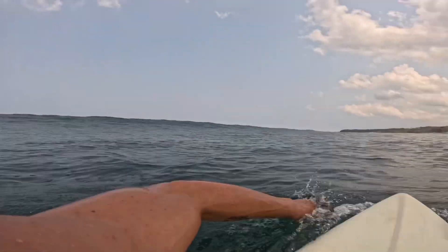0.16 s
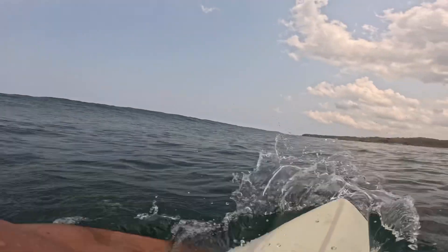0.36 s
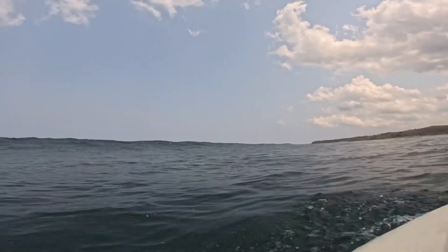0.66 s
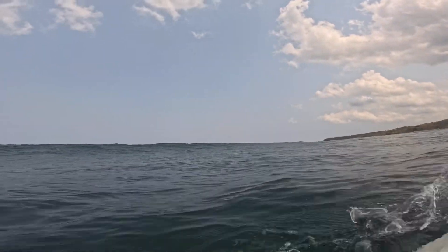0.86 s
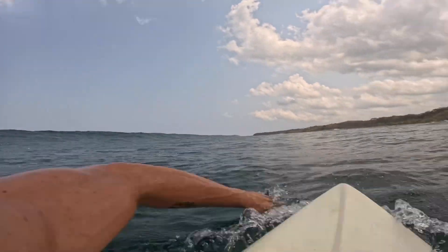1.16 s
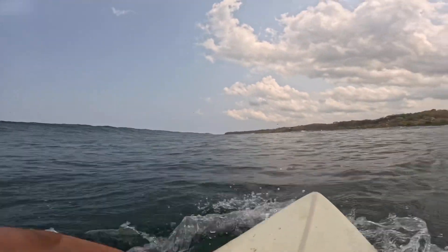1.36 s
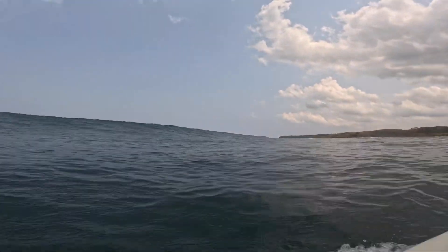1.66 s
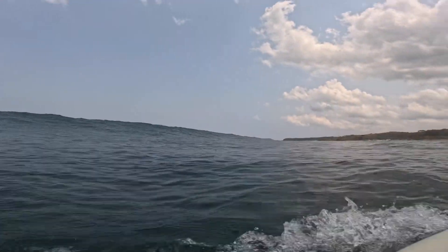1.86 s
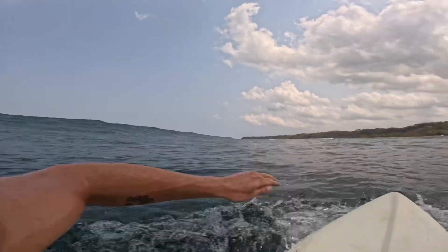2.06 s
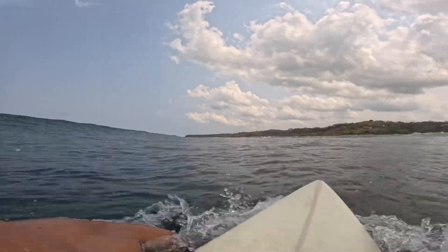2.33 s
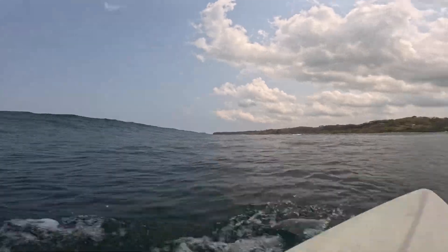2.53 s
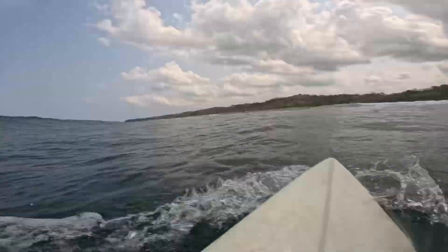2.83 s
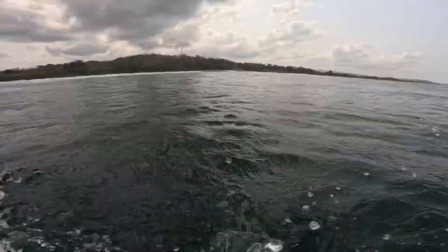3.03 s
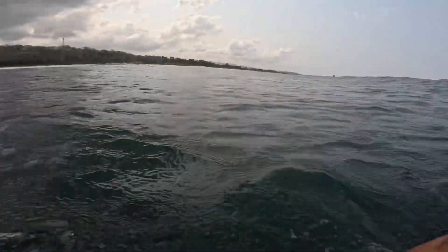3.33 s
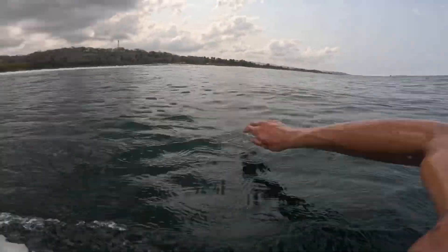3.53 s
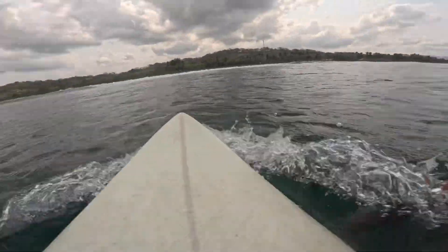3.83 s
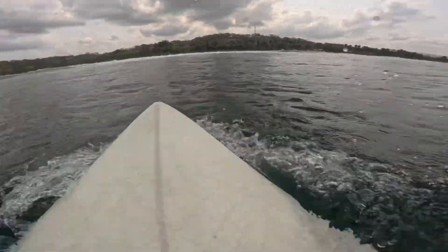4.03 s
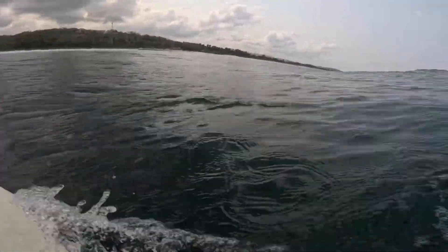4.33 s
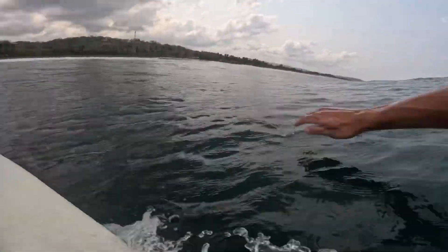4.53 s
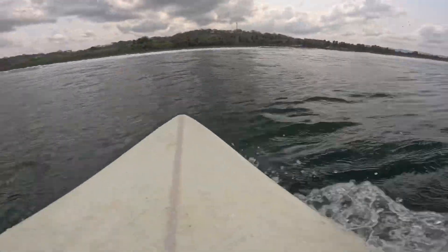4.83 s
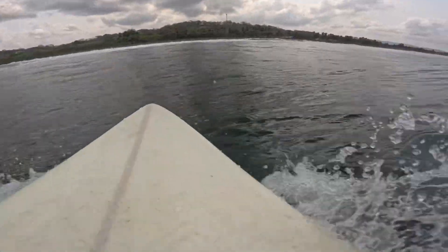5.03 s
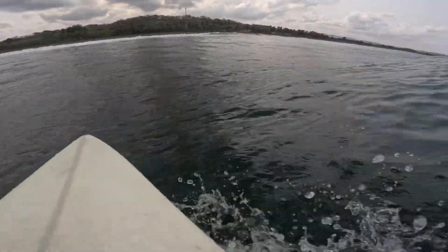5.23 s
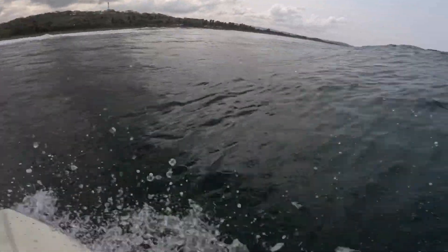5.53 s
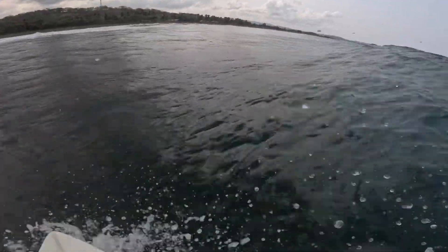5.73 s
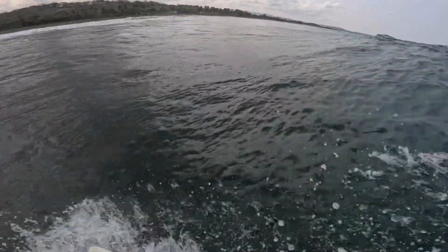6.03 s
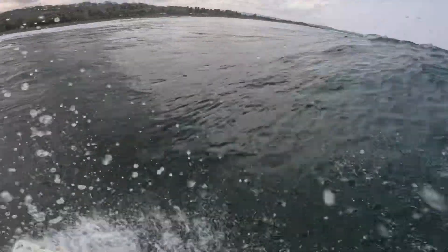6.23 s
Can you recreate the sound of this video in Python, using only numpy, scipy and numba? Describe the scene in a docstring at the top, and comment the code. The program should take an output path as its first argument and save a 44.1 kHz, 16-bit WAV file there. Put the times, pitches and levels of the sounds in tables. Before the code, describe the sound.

A surfer paddles on the sea, heard by one microphone on the board, centred and dull. Lumpy low wind buffets throughout over foamy bubbling. Strokes swell and sink with deep gulps and round plops. Midway the water film drains, letting in spurts of bright, sizzling spray and tiny ticks; afterwards it turns muffled again, with busier slaps, gurgles and a loud low gulp near 5.8 seconds.

```python
"""A surfer paddles on open water, heard by a single microphone in a wet waterproof housing.
A very faint white noise fades from the start, over wind that buffets the port and bubbling wash by the board.
From half a second on, strokes swell low ringing bubbles and noise into surges; gliding tones gulp and plop.
From about 2 to 4.4 s the water film drains off the port: bright spray passes a moving resonance and dip.
After that, slaps, surges, gulps and a few ticking droplets carry on to the end."""
import sys
import numpy as np
from scipy import signal
from scipy.fft import rfft, irfft
from scipy.io import wavfile
from scipy.ndimage import uniform_filter1d
from numba import njit

SR = 44100
rng = np.random.default_rng(int(sys.argv[2]) if len(sys.argv) > 2 else 0)


def store_wav(level_fs):
    """Save 16-bit WAV to argv[1]."""
    pcm = np.round(np.clip(np.atleast_2d(level_fs), -1, 1) * 32767)
    wavfile.write(sys.argv[1], SR, pcm.T.astype(np.int16))


N = 281622

# Slowly rising and sinking wind under the gusts. Each row: time in seconds, level in dB.
WIND_LEVEL = [(0, -40), (.6, -30), (.95, -36), (1.45, -27.5), (1.85, -35), (2.5, -30), (3.3, -34.5),
              (3.7, -24), (4.43, -33.5), (4.7, -31), (5.6, -29.5), (5.95, -29), (6.39, -30)]
# Gusts thumping the port. Each row: arrival at full level in seconds, level in dB.
BUFFETS = [(.56, -21), (0.669, -21.5), (1.029, -19.5), (1.244, -22), (1.315, -23.5), (1.69, -21.5),
           (2.43, -25.5), (2.879, -25), (3.741, -18.5), (4.57, -24), (5.12, -28), (5.301, -26.5),
           (5.57, -24), (6.27, -24.5)]
# Colour of the wind. Each row: frequency in Hz, relative level per Hz in dB.
WIND_SPECTRUM = [(8, -7.5), (16, -2), (35, -4.5), (60, -11.5), (100, -14.5), (160, -26), (300, -65)]

# Sound leaking through the wet port. Each row: time in seconds, dull treble in dB, faint fizz in dB.
LEAK_LEVELS = [(0.0, -55, -52.5), (0.25, -60, -68.5), (0.67, -55, -62), (2.28, -60.5, -64),
               (3.02, -49.5, -78), (3.22, -50.5, -60), (3.54, -51.5, -58), (4.53, -61, -64),
               (4.87, -50.5, -58), (4.96, -54, -57), (5.12, -54.5, -52.5), (5.23, -53.5, -57.5),
               (5.96, -56.5, -59), (6.39, -49, -52.5)]
# Colour of the dull treble. Each row: frequency in Hz, relative level per Hz in dB.
DULL_SPECTRUM = [(1500, -1), (1900, 5.5), (2100, 10), (2450, -0.5), (3000, -38)]
# Colour of the faint fizz. Each row: frequency in Hz, relative level per Hz in dB.
FIZZ_SPECTRUM = [(2000, -15.5), (2700, -1.5), (3900, -5), (4600, -15.5), (5700, -18), (7000, -27.5),
                 (9000, -52)]

# Spray through the draining port. Each row: time in seconds, lower band in dB, upper band in dB,
# brightest hiss in dB.
SPRAY_LEVELS = [(2.12, -85, -94, -115), (2.45, -54, -65.5, -100), (2.8, -48.5, -64, -91),
                (3.15, -46.5, -52.5, -88), (3.29, -64, -56, -66.5), (3.62, -58, -58.5, -65),
                (3.68, -72, -59, -97), (3.86, -52.5, -72, -73), (3.96, -89, -69, -81), (4.1, -61, -66, -99),
                (4.42, -81, -82, -115)]
# Spurts of spray. Each row: arrival at full level in seconds, hold in seconds, lower band in dB,
# upper band in dB, brightest hiss in dB.
SPURTS = [(2.848, 0.031, -40.5, -55, -80), (2.957, 0.12, -50.5, -51, -83), (3.177, 0.037, -48.5, -50, -85),
          (3.246, .01, -58, -59, -57), (3.44, 0.051, -52, -53, -62), (3.658, 0.022, -47, -47.5, -90),
          (3.701, 0.059, -40, -50, -85), (3.804, .005, -62, -55, -68), (3.89, 0.007, -48, -56, -56.5),
          (4.036, 0.072, -52, -62, -85)]
# Water film over the port. Each row: time in seconds, resonance in Hz (before its tremble), dip in Hz,
# dip depth from 0 to 1 for each of two passes.
FILM = [(2.3, 3550, 3850, 0), (2.55, 3550, 3950, .5), (2.78, 3200, 4200, .5), (2.88, 2700, 4350, .6),
        (3.0, 2800, 4600, .6), (3.19, 3850, 5050, .45), (3.24, 4000, 3000, .4), (3.62, 4300, 3000, .4),
        (3.66, 4100, 4800, .1), (3.715, 3750, 5000, .7), (3.78, 4250, 5300, .4), (3.82, 4000, 3000, .3),
        (4.4, 3800, 3000, 0)]
# Colour of the lower spray. Each row: frequency in Hz, relative level per Hz in dB.
LOWER_SPRAY_SPECTRUM = [(1800, -13), (2500, -4.5), (4000, 0.5), (4800, 7.5), (6000, -34.5)]
# Colour of the upper spray. Each row: frequency in Hz, relative level per Hz in dB.
UPPER_SPRAY_SPECTRUM = [(3300, -31), (4200, -16), (5300, 10.5), (6000, -0.5), (6800, -17.5), (7800, -55)]
# Colour of the brightest hiss. Each row: frequency in Hz, relative level per Hz in dB.
EDGE_SPECTRUM = [(5500, -15.5), (6800, 6), (8000, -10), (10000, -26), (15000, -31.5)]

# Droplets ticking on the housing. Each row: start in seconds, ring peak in dB, ring in Hz,
# strength of the broad crack in dB.
TICKS = [(.651, -40, 2050, -54), (0.701, -60, 2110, -33.5), (2.707, -35.5, 3060, -30),
         (2.849, -38, 2740, -24.5), (2.969, -34, 2460, -46), (2.994, -34, 5360, -47),
         (3.024, -28, 5460, -43), (3.049, -33, 3700, -42), (3.061, -32, 5700, -38), (3.168, -29, 3500, -42),
         (3.208, -35, 5640, -57), (3.305, -33, 5460, -56), (3.348, -46, 3630, -53), (3.484, -34, 5360, -34),
         (3.665, -34, 5600, -55), (3.759, -36, 5750, -47), (3.802, -37.5, 3830, -39),
         (3.87, -39, 5300, -40), (3.897, -36.5, 5400, -35), (4.138, -40, 5000, -47),
         (4.148, -35.5, 1560, -53), (4.834, -42.5, 3900, -36), (5.09, -42.5, 3900, -54),
         (5.139, -45, 5600, -43), (5.1943, -27.5, 1600, -21.5), (6.125, -41, 1820, -36)]
# Colour of the crack. Each row: frequency in Hz, relative level per Hz in dB.
CRACK_SPECTRUM = [(800, -18), (1500, 9.5), (3200, 10.5), (4500, -16.5), (6000, -20.5), (7500, -42)]
# Large bubbles popping by the board. Each row: start in seconds, peak in dB, starting pitch in Hz.
PLOPS = [(1.164, -21.5, 770), (2.155, -23.5, 930), (2.264, -23.5, 980), (3.413, -17, 900),
         (3.544, -14.5, 318), (4.149, -14, 850), (4.253, -25.5, 660), (4.565, -24.5, 1190),
         (4.808, -16.5, 1106), (4.992, -22, 790), (5.284, -18.5, 550), (5.786, -18, 640)]
# Air pockets under the board, gliding as they change size. Each row: start in seconds, length in seconds,
# start pitch in Hz, end pitch in Hz, peak in dB.
GULPS = [(0.498, 0.017, 263, 245, -16.5), (.532, 0.085, 207.5, 168, -19.5), (0.621, 0.04, 238, 280, -22),
         (3.468, 0.061, 353, 232, -19), (4.822, 0.052, 600, 521, -19.5), (5.802, 0.056, 900, 1225, -27.5),
         (3.652, 0.029, 131, 115, -22), (4.844, 0.027, 302, 197, -17), (4.895, 0.058, 202, 278, -21),
         (5.222, 0.1, 329.4, 162, -19), (5.776, 0.06, 322, 291, -21), (5.842, 0.024, 199, 170, -9)]

# Water running along the board between strokes. Each row: time in seconds, surge in dB, wash in dB.
WAKE_LEVELS = [(0, -34, -35), (.12, -48.5, -44.5), (.45, -42.5, -41), (.85, -50.5, -35),
               (1.3, -36.5, -35.5), (1.95, -67, -38), (2.75, -48, -39), (3.27, -33, -40), (3.34, -54, -44),
               (3.8, -36, -36), (4.72, -43, -37.5), (5.0, -30, -28), (5.7, -35.5, -33.5),
               (6.39, -41.5, -33.5)]
# Water slapping the board. Each row: arrival at full level in seconds, hold in seconds, splash in dB.
SLAPS = [(1.234, 0.067, -44.5), (3.446, .02, -42), (3.572, 0.021, -44.5), (4.054, 0.02, -48),
         (4.793, 0.073, -34), (5.74, 0.045, -37.5), (6.132, 0.019, -37.5)]
# Strokes and lunges of the board. Each row: arrival at full level in seconds, rise in seconds,
# hold in seconds, fall in seconds, surge in dB, deep surge in dB, wash in dB.
STROKES = [(0.522, 0.064, 0.14, 0.16, -20, -21.5, -32.5), (1.469, 0.17, 0.072, 0.29, -28, -24.5, -39),
           (2.397, 0.46, 0.18, 0.23, -28, -26, -37.5), (3.476, 0.18, 0.04, 0.25, -19, -20, -35),
           (4.81, 0.042, 0.087, 0.054, -19.5, -30, -34.5), (5.299, 0.062, .02, 0.19, -26.5, -33, -40),
           (5.785, 0.031, 0.036, 0.053, -17.5, -25, -28.5), (5.957, 0.24, 0.066, 0.045, -32, -20, -58)]
# Colour of the splash. Each row: frequency in Hz, relative level per Hz in dB.
SPLASH_SPECTRUM = [(1000, -21), (1400, -2.5), (1700, -6.5), (2000, -14), (2600, -29)]
# Colour of the wash. Each row: frequency in Hz, relative level per Hz in dB.
WASH_SPECTRUM = [(150, 1.5), (300, -5.5), (500, -1.5), (800, 2.5), (1100, 2), (1380, -6), (1600, -27),
                 (2200, -42.5)]
# Colour of the surge. Each row: frequency in Hz, relative level per Hz in dB.
SURGE_SPECTRUM = [(50, -9.5), (90, -4), (170, -2), (300, -2), (500, -5), (900, -12), (1400, -37.5),
                  (2000, -53)]

# Rise and fall are the times for 20 dB.
BUFFET_RISE_S, BUFFET_HOLD_S, BUFFET_FALL_S = 0.061, 0.025, 0.049
SPURT_RISE_S, SPURT_FALL_S = 0.036, 0.038
SLAP_RISE_S, SLAP_FALL_S = 0.052, 0.054
FADING_NOISE_DB, FADE_DB_PER_S = -68.5, 26.5
SPLASH_IN_WAKE_DB = -19   # relative to the wash of the wake
DEEP_HZ = 168   # the deep surge lies below
NOISE_FLOOR_DB, CUTOFF_HZ = -108, 15600


def from_db(db):
    """Decibels to amplitude."""
    return 10 ** (np.asarray(db) / 20)


def rms_one(x):
    """Scales x to an rms of 1."""
    return x / np.sqrt(np.mean(x ** 2) + 1e-20)


def evened(x, span):
    """Holds the level even over span samples."""
    return x / np.sqrt(uniform_filter1d(x ** 2, size=span) + 1e-20)


def in_time(rows):
    """Draws each column of a timed table as a curve of straight lines."""
    s, *columns = np.transpose(rows)
    return [np.interp(np.arange(N) / SR, s, column) for column in columns]


def filtered(x, order, hz, kind="low"):
    """Butterworth low-pass or high-pass."""
    return signal.sosfilt(signal.butter(order, hz, kind, fs=SR, output="sos"), x)


def drift(corner_hz):
    """Slow chance: noise through a double one-pole low-pass, spread 1."""
    step = 40   # samples between slow values
    r = np.exp(-2 * np.pi * corner_hz * step / SR)
    noise = rng.standard_normal(N // step + 2002)
    slow = signal.lfilter([1], [1, -2 * r, r * r], noise)[2000:]   # skips the filter's start-up
    return np.interp(np.arange(N) / step, np.arange(len(slow)), rms_one(slow))


def swells(base_db, full_s, rise_s, hold_s, fall_s, peak_db):
    """Adds swells in power to a level: each climbs 20 dB per rise time, holds, sinks 20 dB per fall time."""
    t = np.arange(0, N + 64, 64) / SR
    since = t - np.reshape(full_s, (-1, 1))
    rise, hold, fall, peak_db = (np.reshape(v, (-1, 1)) for v in (rise_s, hold_s, fall_s, peak_db))
    climb_db = 20 * np.minimum(since, 0) / rise
    sink_db = 20 * np.maximum(since - hold, 0) / fall
    power = np.sum(from_db(2 * (peak_db + climb_db - sink_db)), axis=0)
    return np.sqrt(from_db(2 * base_db) + np.interp(np.arange(N) / SR, t, power))


def coloured(x, spectrum):
    """Gives x the spectrum through a causal (minimum-phase) filter; rms 1."""
    size = 8192
    hz, level_db = np.transpose(spectrum)
    log_hz = np.log(np.fft.rfftfreq(size, 1 / SR) + 1)
    curve_db = np.interp(log_hz, np.log(hz), level_db, -90, -165)
    cepstrum = irfft(np.log(from_db(curve_db)))
    # folding the cepstrum forward in time makes the phase minimal
    cepstrum[1:size // 2] *= 2
    cepstrum[size // 2 + 1:] = 0
    impulse = irfft(np.exp(rfft(cepstrum)))
    return rms_one(signal.fftconvolve(x, impulse)[:N])


def ring(clicks, hz, t60):
    """A resonator: a unit click sets a sine ringing that sinks 60 dB in t60 seconds."""
    r, w = from_db(-60 / (t60 * SR)), 2 * np.pi * hz / SR
    return signal.lfilter([0, np.sin(w)], [1, -2 * r * np.cos(w), r * r], clicks + 1e-18)


@njit
def moving_resonance(x, hz, width_hz, rate):
    """Two-pole band-pass of gain 1 whose centre moves."""
    out, r = np.zeros(len(x)), np.exp(-np.pi * width_hz / rate)
    for i in range(2, len(x)):
        out[i] = ((1 - r * r) / 2 * (x[i] - x[i - 2])
                  + 2 * r * np.cos(2 * np.pi * hz[i] / rate) * out[i - 1] - r * r * out[i - 2])
    return out


def bubbling(spectrum, per_s, cycles, spread_db, noise_share, patchy_db, count):
    """Random bubbles and turbulent noise ring count pitches across the spectrum; each pitch flickers."""
    sizes = from_db(spread_db * np.minimum(rng.exponential(1, N), 4)) * rng.choice([-1, 1], N)
    born = rng.random(N) < per_s * from_db(4 * drift(8)) / SR      # they come in clumps
    dealt = rng.integers(0, count, N)      # which pitch each bubble rings
    together, out = drift(5.8), 0
    for k, hz in enumerate(np.geomspace(spectrum[0][0], spectrum[-1][0], count)):
        bubbles = rms_one(sizes * born * (dealt == k))
        drive = np.sqrt(1 - noise_share) * bubbles + np.sqrt(noise_share) * rng.standard_normal(N)
        flicker = from_db(patchy_db * (together + drift(13.3)))
        out = out + np.sqrt(hz) * rms_one(ring(drive, hz, cycles / hz)) * flicker
    return evened(coloured(out, spectrum), span=4000)


def pops(events, cycles, rise_cycles, glide):
    """Each event is a short tone that swells, dies 60 dB in some cycles and glides by a share per cycle."""
    out = np.zeros(N + SR)
    for (s, peak_db, hz, *_), slide in zip(events, np.broadcast_to(glide, len(events))):
        turns = np.arange(SR // 8) / SR * hz
        shape = (1 - np.exp(-turns / rise_cycles)) ** 2 * from_db(-60 * turns / cycles)
        tone = np.sin(2 * np.pi * (turns + slide * turns ** 2 / 2)) * shape / shape.max()
        at = round(s * SR)
        out[at:at + len(tone)] += from_db(peak_db) * tone
    return out[:N]


def fading_noise():
    """Very faint white noise that fades steadily in dB from the start."""
    fading_db = FADING_NOISE_DB - FADE_DB_PER_S * np.arange(N) / SR
    return from_db(fading_db) * rng.standard_normal(N)


def wind():
    """Low lumpy noise on the port: slowly rising and sinking wind with gusts on top."""
    full_s, gust_db = np.transpose(BUFFETS)
    wind_db, = in_time(WIND_LEVEL)
    gain = swells(wind_db, full_s, BUFFET_RISE_S, BUFFET_HOLD_S, BUFFET_FALL_S, gust_db)
    noise = evened(coloured(rng.standard_normal(N), WIND_SPECTRUM), span=4500)
    return filtered(noise * gain * from_db(1.33 * drift(11)), 4, 900)


def leaks():
    """Two faint bubbling layers that leak through the wet port: dull treble and fizz."""
    dull_db, fizz_db = in_time(LEAK_LEVELS)
    dull = bubbling(DULL_SPECTRUM, 440, 16.0, spread_db=5.0, noise_share=0.53, patchy_db=3.5, count=4)
    fizz = bubbling(FIZZ_SPECTRUM, 1200, 6.1, spread_db=-1.0, noise_share=0.46, patchy_db=3.0, count=6)
    return from_db(dull_db) * dull, from_db(fizz_db) * fizz


def spray(film_hz):
    """Two bubbling bands and a bright hiss, in spurts; the film's resonance lifts the lower band."""
    full_s, hold, *spurt_dbs = np.transpose(SPURTS)
    low_gain, high_gain, edge_gain = (
        swells(base_db, full_s, SPURT_RISE_S, hold, SPURT_FALL_S, spurt_db)
        for base_db, spurt_db in zip(in_time(SPRAY_LEVELS), spurt_dbs))
    low = bubbling(LOWER_SPRAY_SPECTRUM, 890, 7.5, spread_db=6.0, noise_share=0.61, patchy_db=3.0, count=7)
    trembling_hz = film_hz * (1 + .03 * drift(12))      # the film trembles
    lift = 6.5 * from_db(2.2 * drift(9))
    low = evened(low + lift * moving_resonance(low, trembling_hz, 400.0, SR), span=3000)
    high = bubbling(UPPER_SPRAY_SPECTRUM, 1500, 21.0, spread_db=4.0, noise_share=0.6, patchy_db=2.0, count=7)
    edge = coloured(rng.standard_normal(N), EDGE_SPECTRUM)
    return low_gain * low + high_gain * high + edge_gain * edge


def through_port(fizz):
    """Adds the spray to the fizz; the film cancels a narrow moving dip in both."""
    film_hz, dip_hz, depth = in_time(FILM)
    bright = fizz + spray(film_hz)
    for _ in range(2):      # twice, for a deep dip
        bright = bright - depth * moving_resonance(bright, dip_hz, 450.0, SR)
    return bright


def cracks():
    """The impact of each droplet, a click coloured by the housing."""
    s, _, _, crack_db = np.transpose(TICKS)
    clicks = np.zeros(N)
    clicks[(s * SR).astype(int)] = from_db(crack_db)
    out = coloured(clicks, CRACK_SPECTRUM)
    return out * clicks.max() / np.abs(out).max()


def gulps():
    """Air pockets: each tone swells, loudest late, while its pitch slides from start to end."""
    out = np.zeros(N)
    for s, length, start_hz, end_hz, peak_db in GULPS:
        part = np.linspace(0, 1, round(length * SR))
        phase = 2 * np.pi * np.cumsum(start_hz + (end_hz - start_hz) * part ** 1.9) / SR
        at = round(s * SR)
        out[at:at + len(part)] += from_db(peak_db) * np.sin(np.pi * part ** 1.45) * np.sin(phase)
    return out


def drops():
    """Droplet rings and cracks, plops and gulps, dulled by the wet port's low-pass."""
    ticks = pops(TICKS, cycles=30.0, rise_cycles=3.5, glide=0.0024) + cracks()
    plops = pops(PLOPS, cycles=16.0, rise_cycles=1.9, glide=0.015)
    return filtered(ticks + plops + gulps(), 6, 6800)


def gurgles(count, low_hz, high_hz, tilt_db, cycles):
    """Single bubbles of random size, each sliding up or down in pitch; the high ones are fainter."""
    when, size, pitch, slide = rng.random((count, 4)).T
    hz = low_hz * (high_hz / low_hz) ** pitch
    level_db = -4.0 * np.log(size + .05) - tilt_db * pitch
    events = np.transpose([when * N / SR, level_db, hz])
    return rms_one(pops(events, cycles, rise_cycles=3.0, glide=.05 * (slide - .4)))


def water_gains():
    """Strokes lift the surge and the wash out of the wake; slaps lift the splash."""
    surge_db, wash_db = in_time(WAKE_LEVELS)
    *timing, stroke_surge_db, stroke_deep_db, stroke_wash_db = np.transpose(STROKES)
    full_s, hold, slap_db = np.transpose(SLAPS)
    surge_gain = swells(surge_db, *timing, stroke_surge_db)
    deep_gain = swells(surge_db, *timing, stroke_deep_db)
    wash_gain = swells(wash_db, *timing, stroke_wash_db)
    splash_gain = swells(wash_db + SPLASH_IN_WAKE_DB, full_s, SLAP_RISE_S, hold, SLAP_FALL_S, slap_db)
    return surge_gain, deep_gain, wash_gain, splash_gain


def splash(gain):
    """Water slapping the board: short-ringing bubbles over some noise."""
    return gain * bubbling(SPLASH_SPECTRUM, 400, 2.6, spread_db=0.0, noise_share=0.27, patchy_db=-2.5, count=4)


def wash(gain):
    """Foam bubbling in the wash: mostly turbulent noise ringing, with single gurgles."""
    foam = bubbling(WASH_SPECTRUM, 460, 3.74, spread_db=2.0, noise_share=0.87, patchy_db=3.0, count=8)
    bubbles = gurgles(count=600, low_hz=330, high_hz=1300, tilt_db=2.5, cycles=32.0)
    return gain * (foam + from_db(-5) * bubbles)


def surge(gain, deep_gain):
    """Low surge along the board, its deep part swelling on its own, with single gurgles."""
    body = bubbling(SURGE_SPECTRUM, 150, 3.9, spread_db=2.0, noise_share=0.8, patchy_db=1.8, count=8)
    deep, upper = filtered(body, 4, DEEP_HZ), filtered(body, 4, DEEP_HZ, "high")
    bubbles = gurgles(count=350, low_hz=178.4, high_hz=957, tilt_db=5, cycles=34.0)
    return deep_gain * deep + gain * (upper + from_db(-5.5) * bubbles)


def scene():
    """All sound is summed at one port, so both channels are alike."""
    surge_gain, deep_gain, wash_gain, splash_gain = water_gains()
    dull, fizz = leaks()
    port = wind() + dull + through_port(fizz) + drops()
    port = port + splash(splash_gain) + wash(wash_gain) + surge(surge_gain, deep_gain)
    port = port + fading_noise()
    return np.array([port, port])


def record(dry):
    """A very faint steady noise floor is added, the top is cut."""
    noise_floor = from_db(NOISE_FLOOR_DB) * rng.standard_normal(N)
    return signal.sosfilt(signal.cheby2(12, 70, CUTOFF_HZ, fs=SR, output="sos"), dry + noise_floor)


dry = scene()
out = record(dry)
store_wav(out)
```